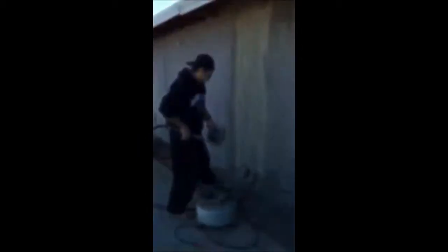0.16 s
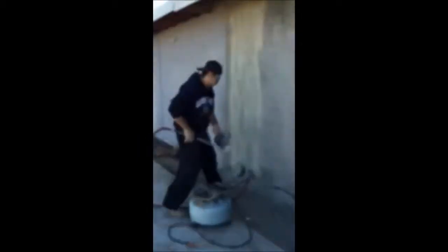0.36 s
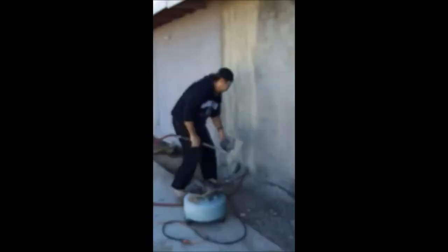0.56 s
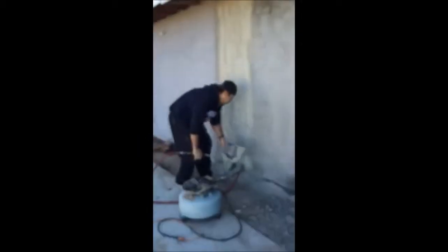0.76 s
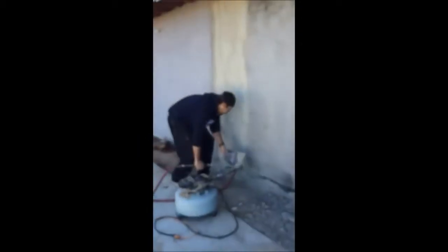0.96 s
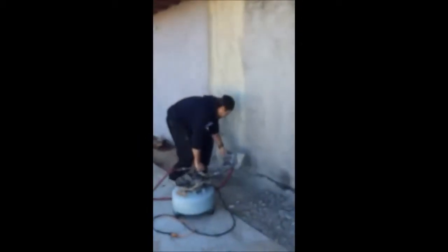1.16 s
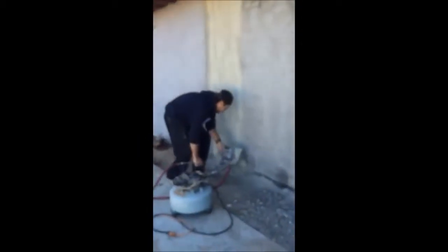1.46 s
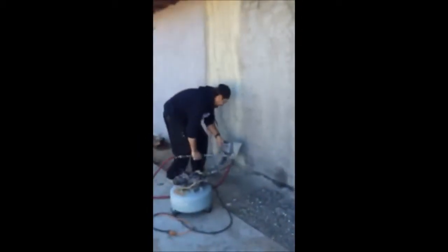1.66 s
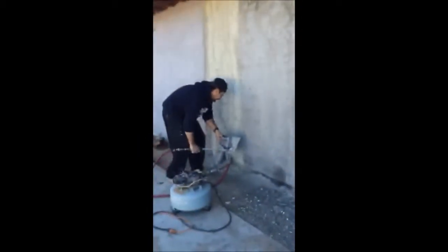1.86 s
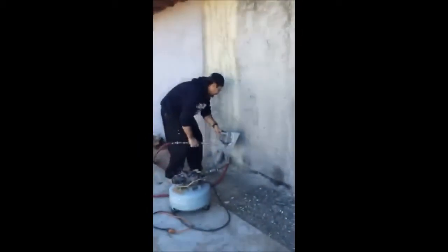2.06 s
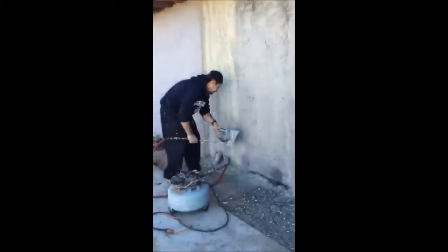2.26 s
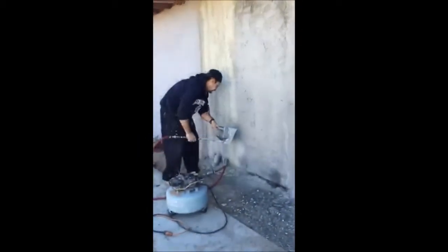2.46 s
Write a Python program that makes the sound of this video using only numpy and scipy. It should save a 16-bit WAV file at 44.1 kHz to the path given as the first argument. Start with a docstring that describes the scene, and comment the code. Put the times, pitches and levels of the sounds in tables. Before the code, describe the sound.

Compressed-air plaster sprayer blasts with a rough, sputtering roar over a steadily droning compressor

```python
"""Outdoors beside a wall, an engine-driven compressor runs steadily: harmonics of the turn rate form its
exhaust, hiss puffs once a turn are its valves, shaped noise is its fan and slower swells its rushes.
A hopper gun is then triggered: noise roars from the nozzle and sputters as slugs of wet plaster pass,
ringing two nozzle cavities and echoing off the wall; resonant low noise is the hopper's rumble."""
import sys
import numpy as np
from scipy import signal
from scipy.fft import rfft, irfft, next_fast_len
from scipy.io import wavfile
from scipy.ndimage import uniform_filter1d, map_coordinates

SR = 44100
rng = np.random.default_rng(int(sys.argv[2]) if len(sys.argv) > 2 else 0)


def magnitude_from_level(level_db):
    """Linear magnitude for a level in decibels (20 dB per decade)."""
    exponent = np.asarray(level_db, float) / 20
    return 10 ** exponent


def wav_out(sig):
    """Save sig, one row per channel (or a flat mono array), as 16-bit PCM at SR to the path in sys.argv[1]."""
    wavfile.write(sys.argv[1], SR, np.round(np.clip(np.atleast_2d(sig).T, -1, 1) * 32767).astype(np.int16))


N = 115101

TURNS_PER_S = 32.103
TRIGGER_S = 1.358
EVENNESS = 0.6   # share of the random swell of the cavity noise that is ironed out, 0-1

# Air flow between slugs. Each row: time in seconds, level in dB before the sputter.
AIR_FLOW = [(1.36, -19), (1.414, -17.5), (1.534, -24.5), (2.424, -23), (2.61, -23.5)]
# Tone of the air jet. Each row: frequency in Hz, relative density in dB per Hz; the last row is unused.
JET_SPECTRUM = [(410, -54), (700, -32), (954, -27), (1100, -12), (1250, -7), (1680, 0.5), (2610, 1.5),
                (3250, -5.5), (4490, -0.5), (4910, -3.5), (10500, -9), (13100, -6), (15300, -15)]
# Slugs of plaster in the nozzle. Each row: middle in seconds, level in dB before a trim,
# length in seconds, treble relative to the mid band in dB before a trim.
PLASTER_SLUGS = [(1.3725, -9.5, 0.0112, -4), (1.3849, -8.4, 0.016, -5), (1.4158, -10.2, 0.0125, -8),
                 (1.4353, -10.3, 0.0109, -7), (1.4551, -10.4, 0.0054, -4), (1.4704, -12.4, 0.0037, -3),
                 (1.4888, -10.2, 0.0099, -7), (1.5038, -13.6, 0.0056, -3), (1.5181, -9.7, 0.0097, -10),
                 (1.5411, -12.6, 0.0149, -6), (1.5541, -16.4, 0.0039, -3), (1.5697, -8.2, 0.0078, -13),
                 (1.5825, -14.7, 0.0101, -5), (1.6054, -9.6, 0.0056, -12), (1.6244, -11.0, 0.0101, -12),
                 (1.6392, -14.5, 0.0062, -2), (1.657, -13.6, 0.0082, -4), (1.673, -16.1, 0.0045, -4),
                 (1.6864, -12.6, 0.0058, -3), (1.6989, -13.4, 0.0059, 3), (1.7162, -14.2, 0.0069, -4),
                 (1.7473, -13.5, 0.009, -6), (1.7626, -15.9, 0.0059, 1), (1.7751, -14.2, 0.0074, -4),
                 (1.7944, -9.2, 0.0049, -11), (1.8125, -13.1, 0.0097, -6), (1.829, -14.1, 0.009, -3),
                 (1.8467, -12.9, 0.0112, -4), (1.8652, -15.1, 0.0112, -4), (1.885, -11.5, 0.0076, -6),
                 (1.8939, -11.8, 0.0034, -10), (1.9234, -12.0, 0.0118, -10), (1.952, -13.3, 0.016, -7),
                 (1.9734, -13.6, 0.0159, -4), (1.9934, -14.7, 0.0159, -4), (2.0244, -13.8, 0.0143, -4),
                 (2.0444, -15.4, 0.0081, 1), (2.059, -11.9, 0.0062, -7), (2.0811, -15.3, 0.0039, 0),
                 (2.0889, -15.2, 0.0148, -4), (2.1052, -15.0, 0.0051, -6), (2.1305, -15.3, 0.016, -3),
                 (2.1533, -13.6, 0.0087, -5), (2.1665, -15.4, 0.009, 0), (2.1924, -17.2, 0.0041, -3),
                 (2.2052, -14.4, 0.0072, -2), (2.2272, -11.8, 0.0092, -8), (2.2469, -15.0, 0.0044, -1),
                 (2.2571, -13.8, 0.0071, -5), (2.269, -15.6, 0.0079, -2), (2.2855, -13.8, 0.0045, -4),
                 (2.3111, -11.6, 0.0139, -6), (2.3291, -13.2, 0.0049, -5), (2.3578, -13.6, 0.0093, -7),
                 (2.3729, -9.7, 0.0054, -6), (2.397, -11.5, 0.0089, -9), (2.4139, -13.6, 0.0101, -6),
                 (2.4287, -12.8, 0.0069, -4), (2.4495, -10.9, 0.0093, -10), (2.4671, -13.9, 0.0117, -6),
                 (2.4888, -12.3, 0.0123, -5), (2.5032, -11.4, 0.0082, -5), (2.52, -14.2, 0.0092, -5),
                 (2.5364, -12.4, 0.0051, -6), (2.5475, -11.1, 0.0058, -8), (2.5703, -15.6, 0.0067, -5),
                 (2.5926, -13.1, 0.006, -6)]
# The gun moves along the wall. Each row: time in seconds, low cavity in Hz, its relative level in dB,
# upper cavity in Hz, its relative level in dB, wall echo lag in seconds, echo share 0-1.
GUN_PATH = [(1.36, 2130, -9.5, 3350, -4, 0.00049, 0), (1.45, 1800, -7.5, 3620, -6.5, 0.00052, 0.1),
            (1.6, 2000, -2.5, 3570, -7, 0.00057, 0.3), (1.75, 1872, -13.5, 4540, -14, 0.00055, 0.5),
            (1.85, 1500, -6.5, 4240, -6, 0.00056, 0.45), (1.92, 1440, -8, 3300, -2, 0.0007, 0.15),
            (2.05, 1420, -20.5, 3900, -8, 0.00066, 0.4), (2.2, 1400, -5, 2800, -11, 0.00098, 0.6),
            (2.3, 1220, -12.5, 3180, -6.5, 0.00064, 0.2), (2.45, 1210, -10.5, 3400, -5.5, .00068, 0.6),
            (2.53, 1250, -7.5, 3000, -10, 0.00066, 0.3), (2.61, 1380, -7, 2940, -2, 0.0008, 0.3)]
# Rumble of the load. Each row: time in seconds, level in dB before a trim.
HOPPER_RUMBLE = [(1.36, -30), (1.502, -24.5), (1.69, -53), (1.77, -27), (1.826, -52), (1.856, -33.5),
                 (2.032, -37), (2.052, -29.5), (2.156, -39), (2.258, -34), (2.282, -49), (2.348, -30),
                 (2.434, -52), (2.488, -33.5), (2.56, -42), (2.61, -54)]
# Exhaust harmonics. Each row: multiple of the turn rate, relative level in dB.
EXHAUST_HARMONICS = [(1, -26), (2, -5), (3, -12.5), (4, -18.5), (5, 1), (6, -0.5), (7, 1), (8, -22.5),
                     (9, -3.5), (10, -32.5), (11, -8.5), (12, -1), (13, -8.5), (14, -1.5), (15, -3),
                     (16, 0), (17, -4), (18, -20.5), (19, -9), (20, -16), (21, -7), (22, -28.5), (23, -8),
                     (24, -31.5), (25, -44), (26, -9), (27, -4), (28, -5.5), (29, -0.5), (30, -4), (31, 0),
                     (32, -17), (33, -12), (34, -6.5), (35, -1), (36, -24.5), (37, -20.5), (38, 1.5),
                     (39, -7.5), (40, -7), (41, -5), (42, -13.5), (43, -30.5), (44, -8), (45, -6), (46, -1),
                     (47, -22), (48, -29.5), (49, -5), (50, -28), (51, -3), (52, -15.5), (53, -2),
                     (54, -22), (55, -25), (56, -24.5), (57, -0.5), (58, -18), (59, 3.5), (60, -13),
                     (61, -65), (62, -53), (63, -29), (64, -16), (65, -29), (66, -27), (67, -28),
                     (68, -4.5), (69, -6), (70, -19), (71, -10), (72, -23), (73, -9), (74, -40), (75, -4.5),
                     (76, -14.5)]
# The silencer holds some pitches back longer. Each row: multiple of the turn rate, delay in turns.
SILENCER_DELAYS = [(2, .27), (4, .65), (5, .1), (9, .05), (12, .5), (13, .5), (14, .26), (17, .03),
                   (22, .12), (28, 0), (30, .01), (33, .14), (35, 0), (46, .05)]
# Hiss puffs once a turn. Each row: place in the turn 0-1, length in seconds, centre in Hz, width in Hz,
# level in dB about which it drifts.
VALVE_PUFFS = [(.93, .005, 9150, 350, -32), (.06, .004, 9800, 600, -37), (.45, .012, 14600, 500, -38.5),
               (.05, .016, 3330, 130, -34), (.42, .009, 6600, 900, -37), (.05, .005, 12500, 2500, -44),
               (.36, .004, 1100, 600, -30)]
# A slower rush from the machine, perhaps the belt. Each row: middle in seconds, level in dB.
MACHINE_RUSHES = [(.07, -34), (.32, -25.5), (.48, -25), (.71, -23.5), (.93, -25.5), (1.18, -23)]
# Fan noise, low part. Each row: frequency in Hz, relative density in dB per Hz.
FAN_LOW_SPECTRUM = [(18, -43), (30, -21), (50, -22), (80, -16), (110, -12), (160, -12), (250, -13),
                    (330, -16), (400, -11), (520, -11), (620, -16), (780, -13)]
# Fan noise, upper part. Each row: frequency in Hz, relative density in dB per Hz; the last row is unused.
FAN_HIGH_SPECTRUM = [(940, -7.5), (1300, -7), (1580, -15.5), (1850, -1.2), (2200, -13.5), (2600, -17),
                     (3280, -12.5), (4500, -16), (5200, -19.5), (6700, -16), (7600, -29.5), (9320, -21),
                     (10600, -30), (12500, -26.5), (13700, -24.5), (15300, -21.5), (16000, -50)]


def rms_one(x):
    """Scale to rms 1."""
    return x / np.sqrt(np.mean(x ** 2) + 1e-20)


def in_time(rows):
    """Curve columns at every sample."""
    s, *columns = np.transpose(rows)
    return [np.interp(np.arange(N) / SR, s, column) for column in columns]


def drift(rate):
    """Slow chance of spread 1: noise through a double-pole low-pass at rate Hz."""
    step = 20   # samples between drawn values
    r = np.exp(-2 * np.pi * rate * step / SR)
    white = rng.standard_normal(N // step + 2002)
    slow = signal.lfilter([1], [1, -2 * r, r * r], white)[2000:]   # drop the filter's start-up
    return np.interp(np.arange(N) / step, np.arange(len(slow)), rms_one(slow))


def resonance(x, hz, width_hz):
    """Two-pole resonance; white noise in gives rms near 1 out."""
    r = np.exp(-np.pi * width_hz / SR)
    gain = np.sqrt((1 - r * r) / 2)
    poles = [1, -2 * r * np.cos(2 * np.pi * hz / SR), r * r]
    return signal.lfilter(gain * np.array([1, 0, -1]), poles, x)


def moving_ring(white, hz, width_hz):
    """Noise twice through a resonance whose centre moves, block by block; rms 1 while the gun is on."""
    out = np.zeros(N)
    block = 256
    for i in range(int(TRIGGER_S * SR) - block, N, block):
        run = white[i - block:i + block]   # one block ahead lets the filter settle
        ring = resonance(resonance(run, hz[i], width_hz), hz[i], 2 * width_hz)
        out[i:i + block] = ring[block:]
    return rms_one(out) * np.sqrt(1 - TRIGGER_S * SR / N)


def banded_noise(spectrum, patchy_db, rate):
    """Third-octave bands of shaped noise, each with its own flicker; rms 1."""
    hz, db = np.transpose(spectrum[:-1])   # the top stays open
    edges = 28 * 2 ** (np.arange(29) / 3)
    size = next_fast_len(N)
    bins_hz = np.arange(size // 2 + 1) * SR / size
    tilt = magnitude_from_level(np.interp(np.log(bins_hz + 1), np.log(hz), db))
    shaped = irfft(rfft(rng.standard_normal((2, N)), size) * tilt, size)[:, :N]
    out = 0
    for k, (low, high) in enumerate(zip(edges, edges[1:])):
        flicker = magnitude_from_level(patchy_db * drift(rate))
        band = signal.butter(2, [low, high], "band", fs=SR, output="sos")
        out = out + flicker * signal.sosfilt(band, shaped[k % 2])   # neighbours use separate noises
    return rms_one(out)


def bumps(times, db, lengths):
    """Smooth swells that peak at the given times; overlaps add as power."""
    out = np.zeros(N)
    for s, level, length in zip(times, db, lengths):
        i = np.arange(max(int((s - 2 * length) * SR), 0), min(int((s + 2 * length) * SR), N))
        swell = magnitude_from_level(level) * np.exp(-((i / SR - s) / length * 2.05) ** 2)
        out[i] = np.hypot(out[i], swell)
    return out


def jet():
    """Turbulent air swells with every slug; below the treble it rings two cavities and meets its wall echo."""
    treble_from_hz = 5500
    flow_db, = in_time(AIR_FLOW)
    low_hz, low_db, high_hz, high_db, lag_s, echo = in_time(GUN_PATH)
    white = rng.standard_normal((2, N))
    hiss = banded_noise(JET_SPECTRUM, patchy_db=1.96, rate=25)
    treble = signal.sosfilt(signal.butter(4, treble_from_hz, "high", fs=SR, output="sos"), hiss)
    body = magnitude_from_level(-2) * signal.sosfilt(signal.butter(4, treble_from_hz, fs=SR, output="sos"), hiss)
    body = body + magnitude_from_level(low_db) * moving_ring(white[0], low_hz, width_hz=410)
    body = body + magnitude_from_level(high_db) * moving_ring(white[1], high_hz, width_hz=530)
    body = body / (uniform_filter1d(body ** 2, size=200) + 1e-3) ** (EVENNESS / 2)

    s, db, length, treble_db = np.transpose(PLASTER_SLUGS)
    sputtering_flow = magnitude_from_level(flow_db + 3.5 * drift(43))
    spatter = magnitude_from_level(1.9 * drift(310))   # fine grit
    body = body * spatter * np.hypot(sputtering_flow, bumps(s, db - 0.5, length))
    reflected = map_coordinates(body, [np.arange(N) - lag_s * SR], order=3)
    body = (body + echo * reflected) / np.hypot(1, echo)

    steady_treble = magnitude_from_level(flow_db + 4)
    return body + treble * np.hypot(steady_treble, bumps(s, db + treble_db + 2.5, length))


def hopper():
    """Low, fairly even rumble of the hopper body: noise through two resonances at one pitch."""
    hz, width_hz, trim_db = 220, 55, 0.5
    level_db, = in_time(HOPPER_RUMBLE)
    ring = resonance(resonance(rng.standard_normal(N), hz, width_hz), hz, 2 * width_hz)
    even = ring / uniform_filter1d(ring ** 2, size=900) ** (EVENNESS / 2)
    return magnitude_from_level(level_db + trim_db) * rms_one(even)


def exhaust():
    """Harmonics phased as one pulse a turn delayed by the silencer; casing harmonics fall anywhere."""
    first_pulse_s, timing_wander_turns = 0.0095, 0.004
    level_db, waver_db, waver_per_s = -38.5, 0.7, 5
    casing_from_order = 46   # from here up the casing rings through the whole turn
    t = np.arange(N) / SR
    turns = (t - first_pulse_s) * TURNS_PER_S + timing_wander_turns * drift(waver_per_s)
    delay_turns = np.interp(np.arange(129), *np.transpose(SILENCER_DELAYS))
    pulse_phase = -2 * np.pi * np.cumsum(delay_turns)   # delay is the slope of phase over frequency
    casing_phase = rng.uniform(0, 2 * np.pi, 129)
    out = np.zeros(N)
    for order, db in EXHAUST_HARMONICS:
        phase = (pulse_phase if order < casing_from_order else casing_phase)[int(order)]
        level = magnitude_from_level(level_db + db + waver_db * drift(waver_per_s))
        out += level * np.sqrt(2) * np.cos(2 * np.pi * order * turns + phase)
    return out


def valves():
    """Narrow hiss let out at fixed places in every turn."""
    turn = np.arange(N) / SR * TURNS_PER_S
    out = np.zeros(N)
    for place, length, hz, width_hz, db in VALVE_PUFFS:
        from_middle_s = ((turn - place + 0.5) % 1 - 0.5) / TURNS_PER_S
        puff = np.exp(-(from_middle_s / length * 2) ** 2)
        out += magnitude_from_level(db + drift(6.9)) * puff * resonance(rng.standard_normal(N), hz, width_hz)
    return out


def rushes():
    """Swells of mid-band noise with some treble."""
    s, db = np.transpose(MACHINE_RUSHES)
    white = rng.standard_normal(N)
    mid = resonance(white, hz=1360, width_hz=280)
    treble = magnitude_from_level(-10) * resonance(white, hz=3300, width_hz=4200)
    return bumps(s, db, np.full(len(s), 0.054)) * (mid + treble)


def fan():
    """Broad, lightly flickering air noise from the fan."""
    return magnitude_from_level(-25.5) * banded_noise(FAN_LOW_SPECTRUM + FAN_HIGH_SPECTRUM, patchy_db=1.8, rate=21)


def scene():
    """Machine throughout, gun from the trigger on."""
    open_s = 0.0026   # time the air takes to come on
    t = np.arange(N) / SR
    machine = exhaust() + valves() + rushes() + fan()
    trigger = np.clip((t - TRIGGER_S) / open_s, 0, 1)
    return (machine + trigger * (jet() + hopper()))[None]


def roll_off(x):
    """The treble ends steeply here."""
    return signal.sosfilt(signal.butter(12, 16290, fs=SR, output="sos"), x)


def record(dry):
    """The microphone overloads softly, rounding peaks; a steep low-pass then cuts the top."""
    overload_level, cutoff_hz = 0.95, 15780
    rounded = overload_level * np.tanh(dry / overload_level)
    low_pass = signal.cheby2(14, 60, cutoff_hz, fs=SR, output="sos")
    mix = signal.sosfilt(low_pass, rounded)
    return roll_off(mix)


dry = scene()
out = record(dry)
wav_out(out)
```